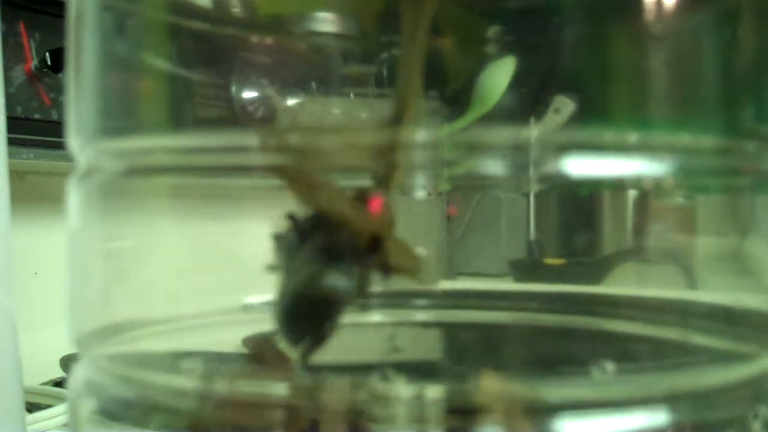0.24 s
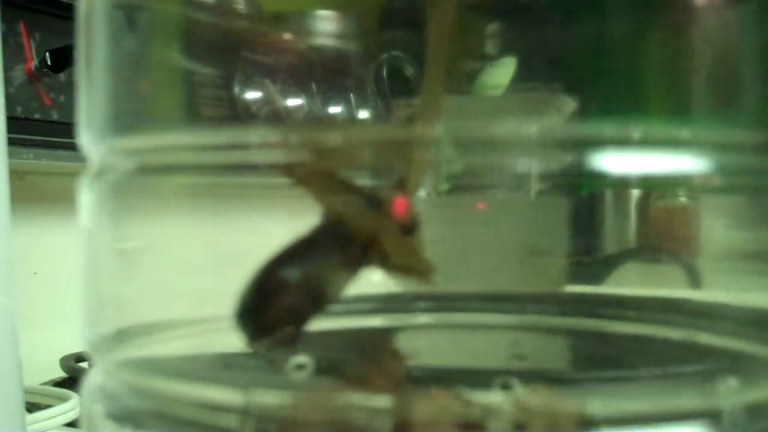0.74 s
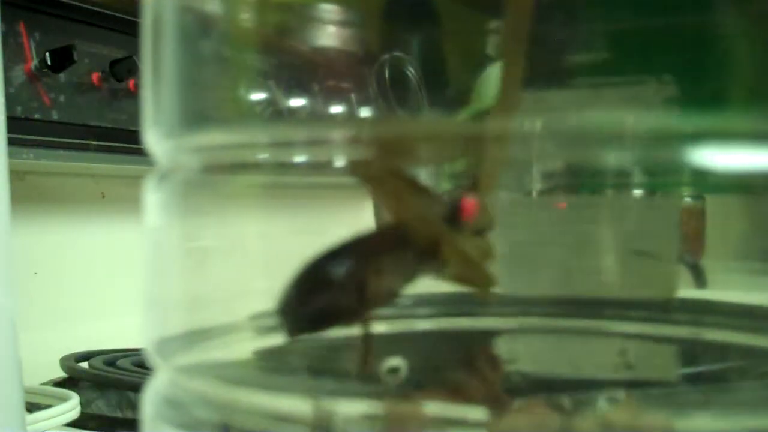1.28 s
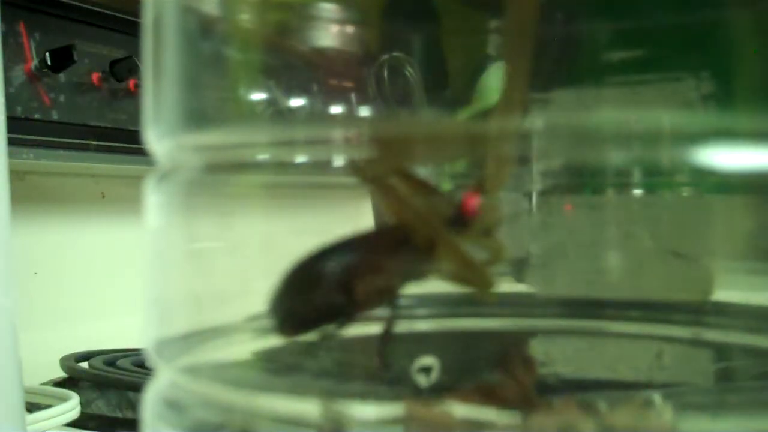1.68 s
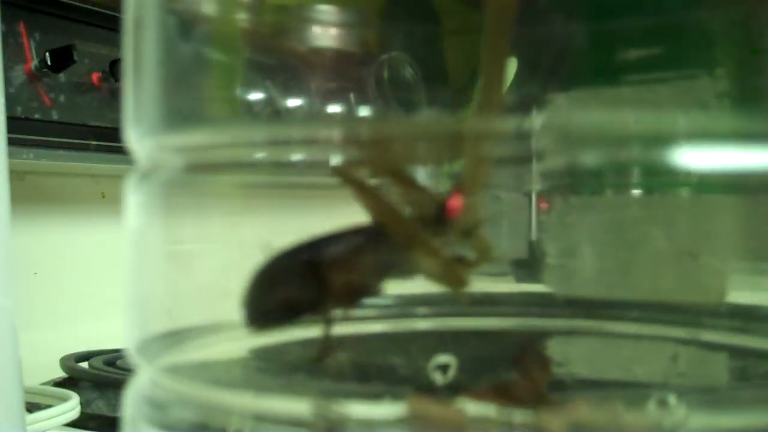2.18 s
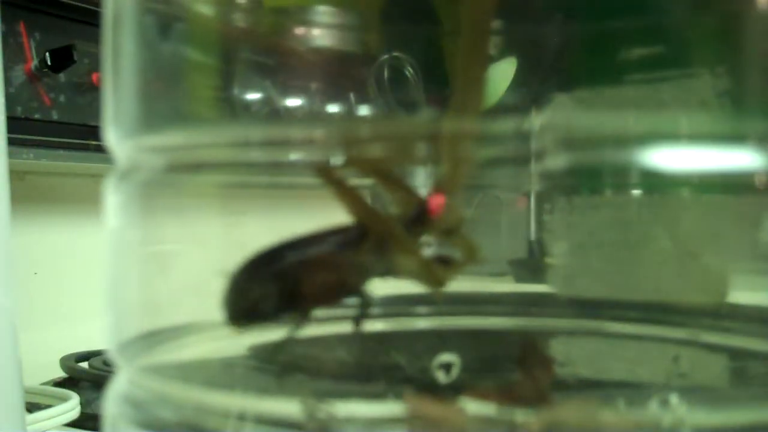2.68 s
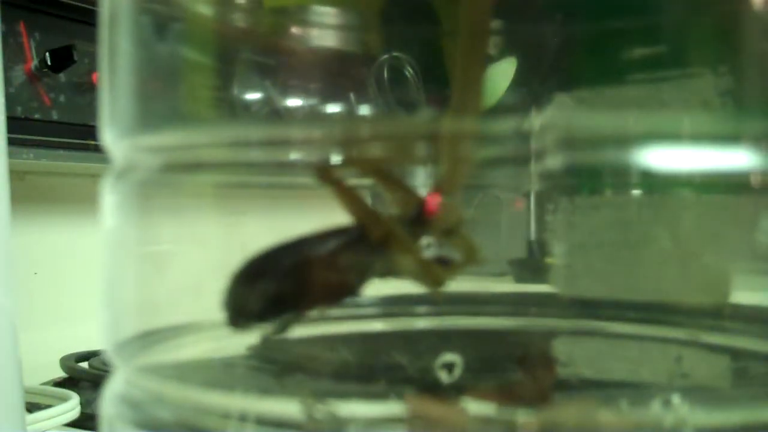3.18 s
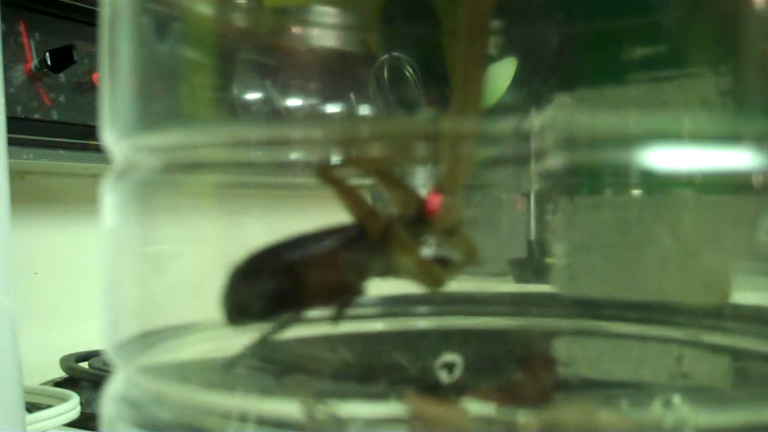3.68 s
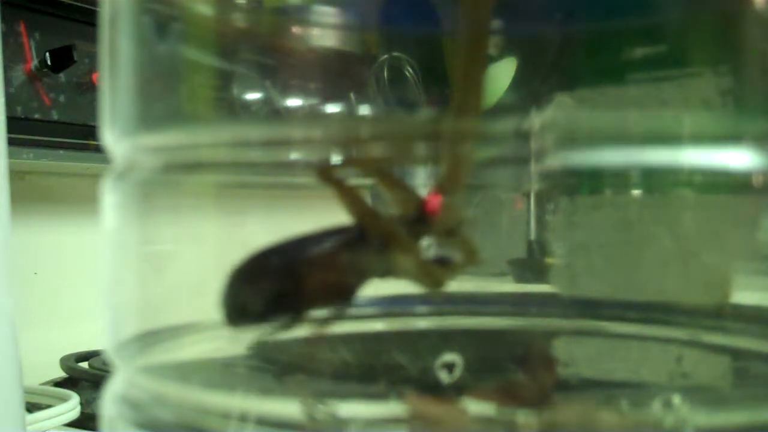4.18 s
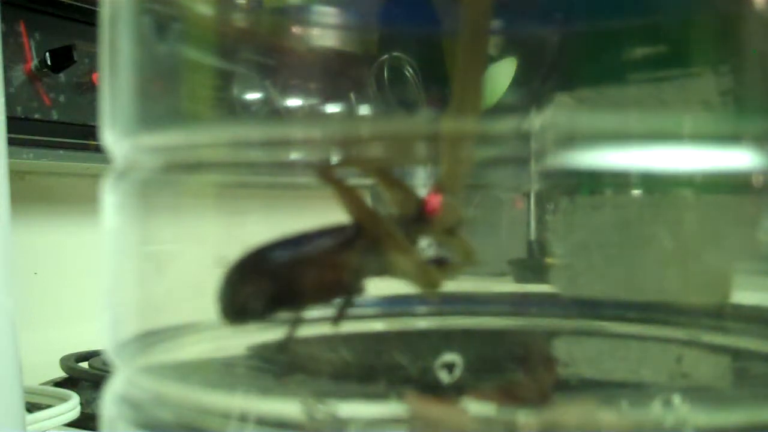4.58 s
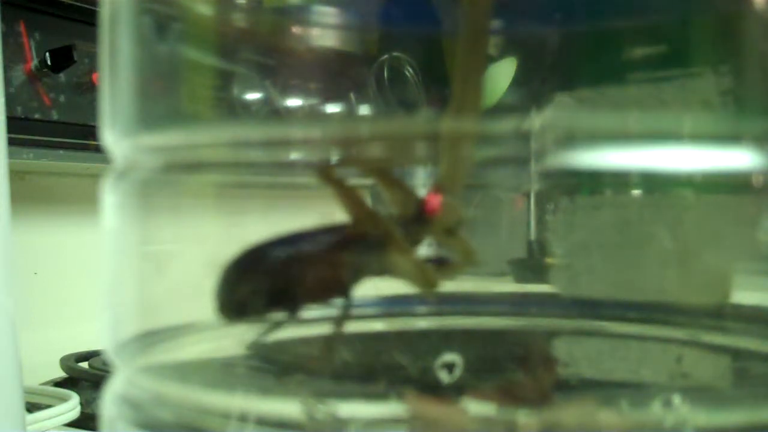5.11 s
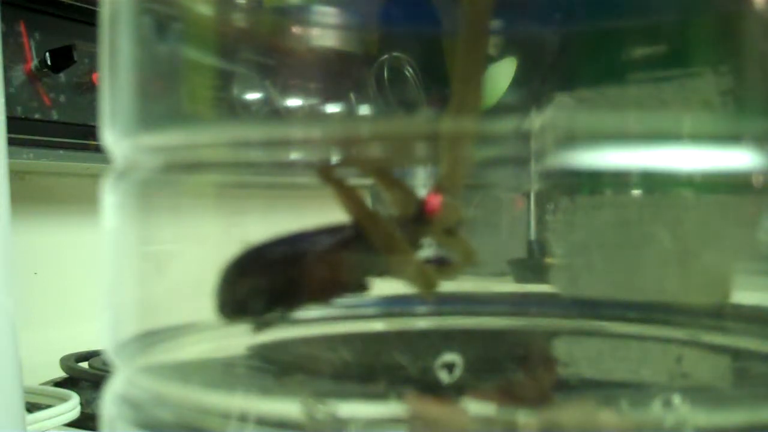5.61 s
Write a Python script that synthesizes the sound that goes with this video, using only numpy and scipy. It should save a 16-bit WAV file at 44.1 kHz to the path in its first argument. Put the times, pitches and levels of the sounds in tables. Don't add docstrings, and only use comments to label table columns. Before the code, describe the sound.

Very close, a beetle scrabbles in a small thin plastic tub: dense bursts of gritty scrapes with sharp little claw ticks. The strokes weaken and thin out, then the tub rocks with a hard, fast double knock and a short low thud. Afterwards faint rasps come about twice a second, with soft brushes, over the low hiss and slight hum of a quiet room.

```python
import sys
import numpy as np
from scipy import signal
from scipy.fft import rfft, irfft
from scipy.io import wavfile
from scipy.ndimage import uniform_filter1d

SR = 44100
rng = np.random.default_rng(int(sys.argv[2]) if len(sys.argv) > 2 else 0)


def file_out(sig):
    cols = np.atleast_2d(sig).T
    lim = np.clip(cols, -1, 1)
    pcm = np.round(lim * 32767).astype(np.int16)
    wavfile.write(sys.argv[1], SR, pcm)


def magnitude_from_level(level_db):
    exponent = np.asarray(level_db, float) / 20
    return 10 ** exponent


N = 257984
T, HZ = np.arange(N) / SR, np.fft.rfftfreq(N, 1 / SR)
BODY_HZ = np.fft.rfftfreq(8192, 1 / SR)

# f/Hz, density/dB
HISS = [(12, -40), (20, -2), (132, -6), (160, -9.5), (189, -8), (398, -4.5), (540, -3.5), (587, -6),
        (914, -5), (3650, -10), (7300, -11.5), (13800, -18), (15000, -21)]
# t/s, rise/s, fall/s, level/dB
RUSTLE = [
    (3.555, 0.018, 0.023, -58),
    (3.62, .04, 0.13, -70),
    (4.2, 0.25, 0.13, -67.5),
    (4.75, 0.48, 0.33, -71.5),
]
# f/Hz, level/dB
HUM = [(118.4, -94), (360.7, -82), (479.1, -93), (721.4, -76.5), (1200, -78.5), (1443, -86), (1680, -81)]
# t/s of the peak, rise/s, fall/s, level/dB
RASPS = [
    (2.68, 0.14, 0.0068, -56.5),
    (3.26, 0.079, 0.021, -59),
    (3.83, 0.091, 0.026, -58),
    (4.21, 0.03, 0.045, -66),
    (4.42, 0.1, 0.027, -58),
    (5.0, 0.085, 0.028, -59),
    (5.56, 0.059, .04, -66.5),
]
# f/Hz, width/Hz, level/dB
RASP_RINGS = [(2395, 480, -5), (3297, 61, 0.5), (3850, 280, -5), (4460, 210, -2), (5490, 240, -2.5),
              (6000, 140, -4), (6490, 110, -4), (6660, 100, -7), (7170, 360, -5.5), (7350, 190, -12),
              (7800, 150, -12), (8240, 82, -6.5)]
# t/s, level/dB, thud against ring/dB, crack/dB
KNOCKS = [
    (3.525, -28.5, -7, -27.5),
    (3.5397, -30, -6, -39),
    (3.5426, -36.5, 9, -33),
    (3.5549, -42, 7.5, -60),
    (3.563, -45, -12, -49),
]
# f/Hz, level/dB, t60/s
TUB_MODES = [(133.6, -20, 0.26), (197, -3, 0.21), (295, -9.5, 0.049), (376, 3.5, 0.042), (440, -18, 0.45),
             (670, -5.5, 0.0095), (752, -11.5, 0.049), (965, -1.5, 0.023), (1230, -4, 0.027),
             (1800, -9, 0.021)]
# f/Hz, level/dB, t60/s
RIM_MODES = [(2300, -7, .012), (3530, 0, 0.013), (4990, -3, 0.0089), (5370, -9, 0.02), (6330, 4.5, 0.0086),
             (6800, 0, .008), (7500, -1, 0.0082)]
# t/s, peak level/dB, ring f/Hz, ring against crack/dB
TICKS = [(0.0189, -31, 7800, 7.5), (0.0287, -29.5, 7900, 8), (0.0778, -22, 6100, -15),
         (0.0814, -29, 7430, 6), (0.2897, -37, 7880, -6.0), (0.3152, -24, 7600, 0), (0.4124, -36, 5860, 8),
         (0.5891, -30, 6000, -5), (0.9529, -21.5, 7060, -3.5), (0.9614, -35, 6480, 13),
         (1.085, -32, 5960, -2), (1.2173, -30, 3520, 0), (1.283, -34.5, 3700, -7), (1.6337, -55, 6900, -9),
         (1.8272, -47.5, 7300, 1), (1.8562, -54, 3690, -8), (2.108, -40, 5050, -3),
         (2.245, -36.5, 6240, -4), (2.3196, -43.5, 6510, -6.0), (2.3416, -46.5, 6470, 0),
         (2.4279, -43.5, 6540, -6.0), (2.4743, -43.5, 3850, -10), (2.7711, -50, 7840, 3),
         (2.8689, -49, 6300, -6.0), (3.0345, -52, 3750, -1), (4.192, -46.5, 3760, -4), (4.64, -58, 2500, 4),
         (5.652, -56.5, 6270, 12.5)]
# t/s of the peak, length/s, effort/dB, lean on the wall/dB
STROKES = [(0.001, 0.17, -47, 5), (0.072, 0.035, -43.5, 2.5), (0.187, 0.071, -46, 3.5),
           (0.313, 0.068, -43, 5), (.434, 0.074, -45.5, 4.5), (0.502, 0.019, -49, 9.5),
           (0.587, 0.12, -45, 3.5), (0.733, 0.087, -43.5, 3.5), (0.89, 0.29, -45.5, 1),
           (0.965, 0.031, -45, 0), (1.108, 0.061, -40.5, 1), (1.225, 0.074, -47.5, 2),
           (1.38, 0.21, -53.5, 3.5), (1.547, 0.057, -47, 6), (1.657, 0.084, -55.5, 6),
           (1.754, 0.026, -58.5, 6.5), (1.835, 0.036, -60.5, 7.5), (1.879, 0.039, -54.5, 4.5),
           (2.015, .043, -53, 7), (2.14, 0.057, -51, 4), (2.251, 0.078, -54.5, 2), (2.327, 0.039, -59, 6),
           (2.388, 0.053, -56.5, 5), (2.509, 0.076, -61.5, 3), (2.568, 0.034, -55, 3.5),
           (2.666, 0.13, -60, 2.5), (2.773, .022, -63.5, 0.5), (2.855, 0.07, -65.5, 0.5),
           (2.924, 0.014, -66, 1), (3.011, 0.065, -67.5, 4.5)]
# t/s, rise/s, fall/s, level/dB
BRUSHES = [
    (4.2, .01, 0.046, -77),
    (4.73, 0.14, 0.069, -67.5),
    (4.88, 0.06, 0.11, -65),
    (5.202, 0.05, 0.079, -67),
    (5.5, 0.11, 0.14, -70),
]
# t/s, height (-1 low to 1 high), claw sharpness/dB
PLACE = [
    (0, 1, 7),
    (.35, 0.34, 3),
    (.85, -0.43, 2),
    (1.15, -0.23, 1),
    (1.45, -0.05, 1.5),
    (1.9, 0.27, 2),
    (2.6, -0.5, -4.5),
    (2.8, 0.17, 1.5),
    (3.1, 0.48, 3.5),
]
# f/Hz, level/dB
WALL = [(24, -55), (40, -33.5), (364, -10.5), (804, -5.5), (980, -4), (1290, -6), (1490, -13), (2340, -7.5),
        (3050, -15), (3560, -3), (4680, -4.5), (5850, -3.5), (7870, -11.5), (13600, -30.5), (15000, -81)]
# f/Hz, width/Hz, level above the broad response/dB
WALL_RINGS = [(108, 80, 3.5), (240, 13, 10), (369, 74, 5), (481, 99, -11), (894, 650, 2), (1054, 63, 6),
              (1272, 43, 5), (1842, 140, 7), (2324, 51, 6.5), (3150, 45, 9), (3568, 240, 8.5),
              (4160, 100, 1.5), (4990, 160, 4.5), (5806, 230, 10), (6130, 250, 8), (6480, 290, 9),
              (6970, 190, 3), (7430, 100, 5), (8090, 400, 6), (7680, 140, 9)]
SPLITS_HZ = [880, 1500, 3000, 5450, 6200, 7050]
# f/Hz, likeness (-1 to 1)
NEAR_SAME = [(60, -0.53), (99, 0.72), (160, 0.93), (270, 0.98), (440, 0.91), (730, 0.94), (1210, 0.98),
             (1990, 0.87), (3290, 0.89), (5420, 0.6), (8940, -0.0077), (14700, -1.2)]
# f/Hz, likeness (-1 to 1)
FAR_SAME = [(60, -0.52), (180, 0.29), (540, 0.34), (1630, 0.23), (3200, -0.18), (6000, 0.057),
            (14700, 0.25)]
# f/Hz, level/dB
NEAR_BALANCE = [(60, -0.5), (1500, 0), (2700, 0.5), (4200, 2), (5500, -1), (6300, 1), (7200, 14),
                (8000, 11.5), (9500, 9.5), (14700, 10.5)]
# f/Hz, level/dB
FAR_BALANCE = [(60, 1.2), (180, 7.4), (540, 3.2), (1630, 3.7), (4900, 2.1), (14700, 1.3)]

NEAR_LAG_S, FAR_LAG_S = 2e-5, 6e-5


def evened(x):
    return x / np.sqrt(np.mean(x ** 2) + 1e-20)


def read(points, hz):
    f, value = np.transpose(points)
    return np.interp(np.log(hz + 1), np.log(f + 1), value)


def bumps(rings, hz, order=1):
    return sum(magnitude_from_level(db) ** 2 / (1 + (2 * (hz - f) / w) ** 2) ** order for f, w, db in rings)


def causal(gain):
    log = np.log(np.maximum(np.r_[gain, gain[-2:0:-1]], 1e-5))
    h = np.fft.ifft(np.exp(np.conj(signal.hilbert(log)))).real
    return h[:len(h) // 2] / np.linalg.norm(h)


def swell(s, rise, fall):
    return np.exp(-abs((T - s) / np.where(T < s, rise, fall)) ** 2.35)


def swells(events):
    return np.sqrt(sum(magnitude_from_level(2 * db) * swell(*when) for *when, db in events))


def waver(noise, smooth):
    return evened(uniform_filter1d(noise, smooth))


def slips(per_s, spread_db):
    size = magnitude_from_level(spread_db * np.minimum(rng.exponential(1, N), 5)) * rng.choice([-1, 1], N)
    return evened(size * (rng.random(N) < per_s / SR))


def scatter(t60):
    t = T[:4096]
    tail = rfft(rng.standard_normal(4096) * magnitude_from_level(-60 * t / t60))
    tail = irfft(tail / (abs(tail) + 1e-9) ** 0.8)
    return tail * magnitude_from_level(-30 * t / t60) / np.linalg.norm(tail)


def ports(left, other, same, balance, lag_s):
    likeness = np.clip(read(same, HZ), -1, 1)
    half = magnitude_from_level(read(balance, HZ) / 2)
    right = likeness * rfft(left) + np.sqrt(1 - likeness ** 2) * rfft(other)
    right = right * np.exp(2j * np.pi * HZ * lag_s)
    return irfft(np.array([rfft(left) * half, right / half]), N)


def wall():
    return magnitude_from_level(read(WALL, BODY_HZ)) * np.sqrt(1 + bumps(WALL_RINGS, BODY_HZ))


def crack(noise, t60, gain):
    t = T[:len(noise)]
    snaps = noise * magnitude_from_level(-60 * t / t60) * (1 - np.exp(-t / 0.00035))
    out = signal.oaconvolve(snaps, causal(gain))[:800]
    return out / abs(out).max()


def ring_down(t, hz, start_db, t60, rise_s):
    return magnitude_from_level(start_db - 60 * t / t60) * np.sin(2 * np.pi * hz * t) * (1 - np.exp(-t / rise_s))


def room():
    noises = rng.standard_normal((4, N))
    hiss_gain = magnitude_from_level(read(HISS, HZ))
    rustle_gain = np.sqrt(bumps([(680, 2300, 0)], HZ, order=2) * HZ / (HZ + 300))
    rustle = swells(RUSTLE)

    def tint(x, gain):
        return evened(irfft(rfft(x) * gain, N))

    left, other = (magnitude_from_level(-63) * tint(noises[k], hiss_gain) + rustle * tint(noises[k + 2], rustle_gain)
                   for k in range(2))
    grow = np.interp(T, [4.2, 5.0], [0.3, 0.8]) * magnitude_from_level(3.0 * waver(noises[0], 6000))
    hum = sum(magnitude_from_level(db + 2.5) * np.sin(2 * np.pi * (hz * T + rng.random())) for hz, db in HUM)
    return magnitude_from_level(3.5) * ports(left, other, FAR_SAME, FAR_BALANCE, FAR_LAG_S) + hum * grow


def rasps():
    level = swells(RASPS) * magnitude_from_level(1.28 * waver(rng.standard_normal(N), 500))
    power = bumps(RASP_RINGS, BODY_HZ, order=2) + bumps([(5200, 1600, -12.5)], BODY_HZ, order=2)
    colour = causal(np.sqrt(power * BODY_HZ / 5000))
    return np.array([signal.oaconvolve(slips(8000, 0.49) * level, colour)[:N] for port in range(2)])


def knocks():
    out, t = np.zeros((2, N)), T[:SR // 3]
    snap_gain = bumps([(6500, 7000, 0)], BODY_HZ, order=2)
    for s, db, thud_db, crack_db in KNOCKS:
        rim, low = out[:, round(s * SR):]
        rim[:800] += magnitude_from_level(crack_db - 4) * crack(rng.standard_normal(800), 0.009, snap_gain)
        for hz, mode_db, t60 in RIM_MODES:
            rim[:len(t)] += ring_down(t, hz, mode_db + crack_db - 3, t60, 0.0004)
        for hz, mode_db, t60 in TUB_MODES:
            start_db = mode_db + db + thud_db * (hz < 340)
            low[:len(t)] += ring_down(t, hz, start_db, t60, 0.001)
    return signal.sosfilt(signal.butter(3, 110, "high", fs=SR, output="sos"), out)


def ticks():
    out, t = np.zeros(N), T[:800]
    treble = wall() * BODY_HZ / 6000
    for s, db, hz, ring_db in TICKS:
        ring = ring_down(t, hz, ring_db, 0.01, 0.0004)
        snap = crack(rng.standard_normal(800), 0.006, treble)
        out[round(s * SR):][:800] += magnitude_from_level(db + 3.0) * (snap + ring)
    return out


def stroke_drives():
    s, length, effort_db, lean_db = np.transpose(STROKES)
    bells = np.array([swell(*row) for row in zip(s, 0.55 * length, 0.45 * length)])

    def force(extra_db):
        return np.sqrt(magnitude_from_level(2 * (effort_db + extra_db)) @ bells)

    deep = force(lean_db + 0.47 * (-48.5 - effort_db))
    boom, mid = force(lean_db), force(0)
    claw = force(0.15 * lean_db)
    at, *place = np.transpose(PLACE)
    height, sharp_db = (np.interp(T, at, v) for v in place)
    brush = swells(BRUSHES)
    return (deep * magnitude_from_level(-3.5),
            boom * magnitude_from_level(-0.73),
            mid * magnitude_from_level(-4.5),
            mid * magnitude_from_level(3.5 * height - 1.4) + 0.69 * brush,
            claw * magnitude_from_level(sharp_db - 4.5) + 0.8 * brush,
            claw * magnitude_from_level(sharp_db - 7 * height - 0.5) + 0.34 * brush,
            claw * magnitude_from_level(0.16 * sharp_db + 1.5 * height - 1.34) + brush)


def scrabble():
    shared = 0.68
    below = [0 * BODY_HZ] + [1 / (1 + (BODY_HZ / f) ** 20) for f in SPLITS_HZ] + [1 + 0 * BODY_HZ]
    drives = stroke_drives()
    grip = evened(magnitude_from_level(1.18 * waver(rng.standard_normal(N), 300)))
    gain = wall()
    out = np.zeros((2, N))
    for row in out:
        common = slips(2500, 1.6)
        for drive, under, upto in zip(drives, below[:-1], below[1:]):
            force = np.sqrt(shared) * common + np.sqrt(1 - shared) * slips(4000, 3.0)
            band = causal(gain * np.sqrt(upto - under))
            row += signal.oaconvolve(force * drive * grip, band)[:N]
    return out


def scene():
    cracks, thuds = knocks()
    hits = ticks() + cracks
    near = scrabble() + rasps()
    scattered_hits = signal.oaconvolve(hits, scatter(0.005))[:N]
    near = near + np.array([hits, scattered_hits])
    near = near + magnitude_from_level(-6.5) * signal.oaconvolve(near, scatter(0.09)[None], axes=1)[:, :N]
    return ports(*near, NEAR_SAME, NEAR_BALANCE, NEAR_LAG_S) + thuds + room()


def band_limit(x):
    return signal.sosfilt(signal.butter(12, 14420, fs=SR, output="sos"), x)


def record(dry):
    return band_limit(dry)


dry = scene()
out = record(dry)
file_out(out)
```